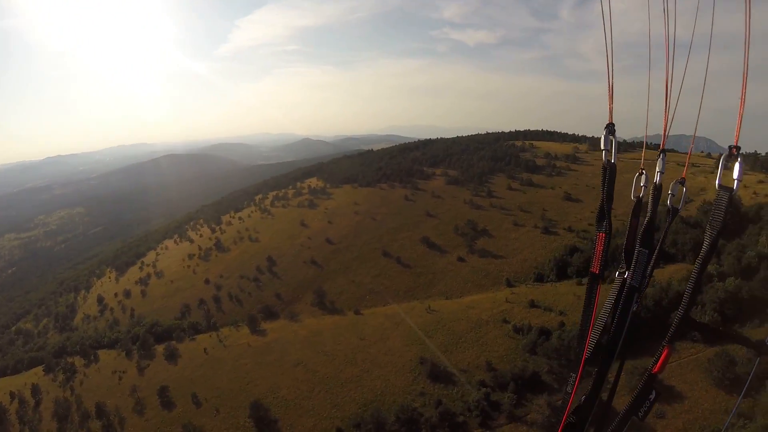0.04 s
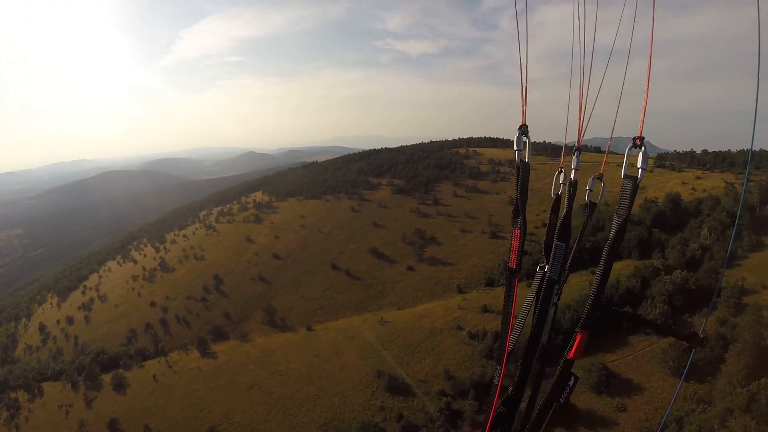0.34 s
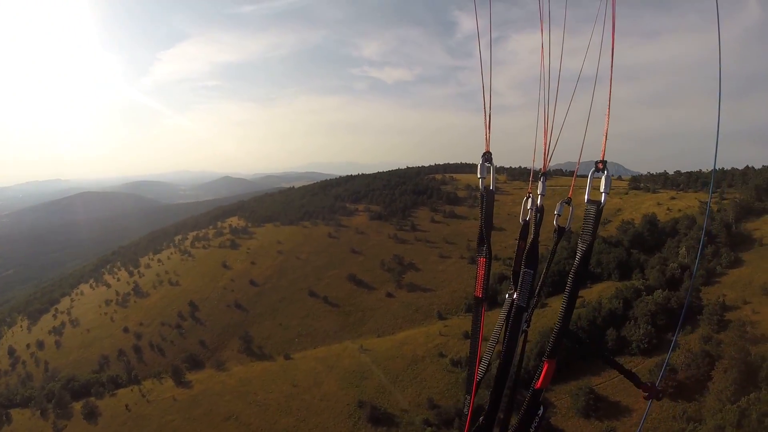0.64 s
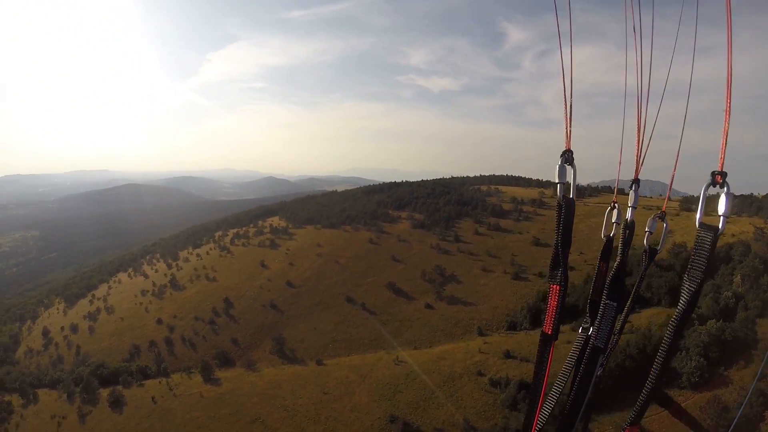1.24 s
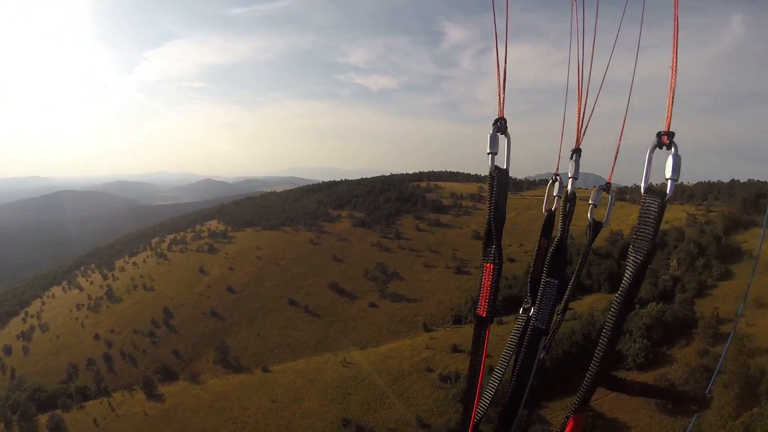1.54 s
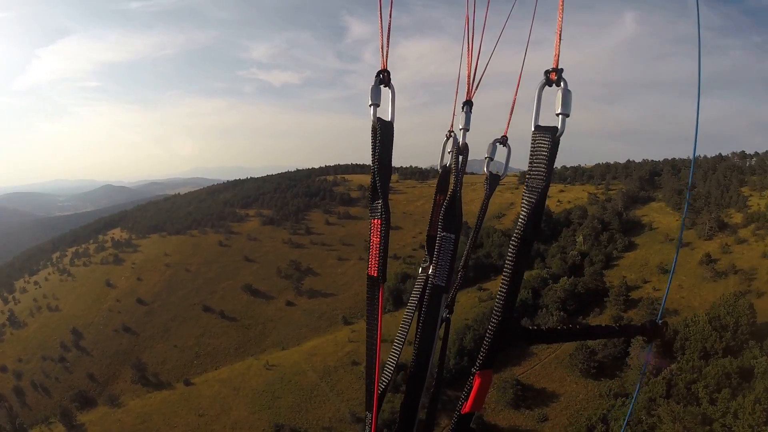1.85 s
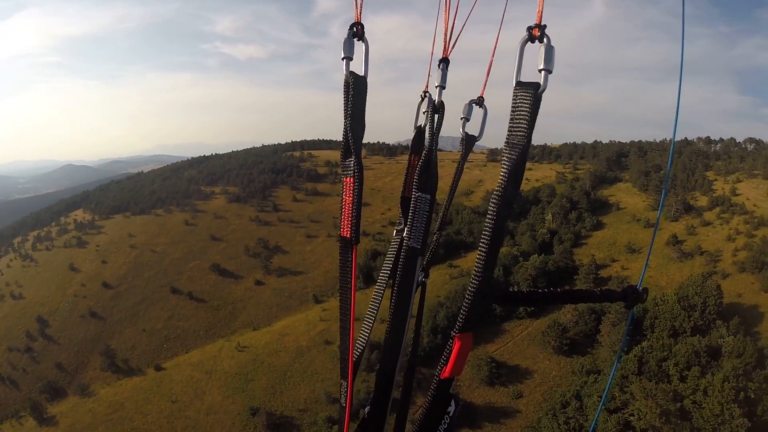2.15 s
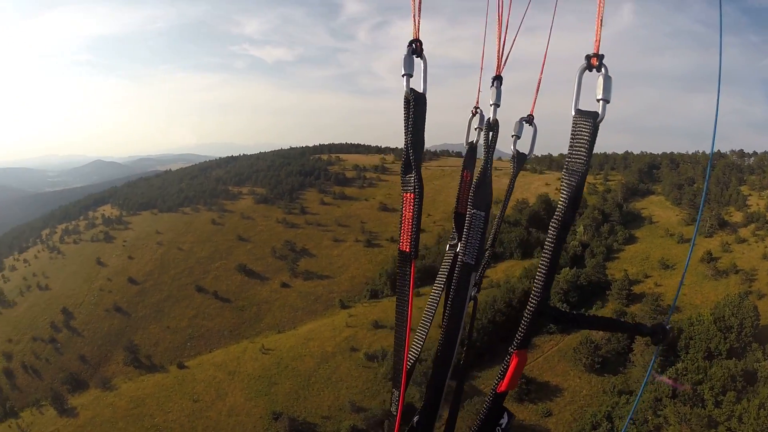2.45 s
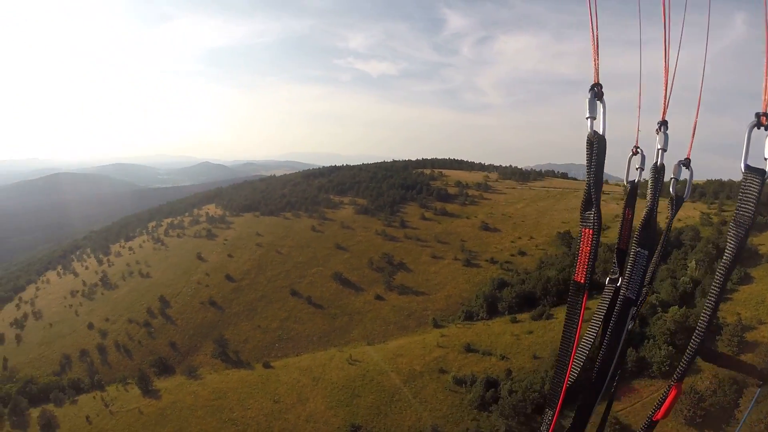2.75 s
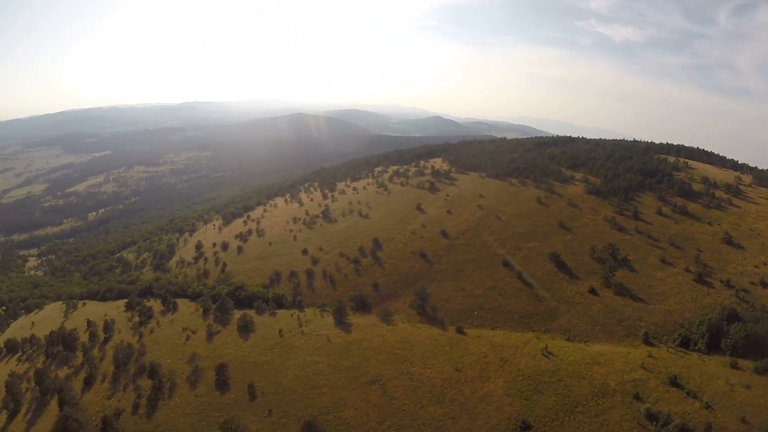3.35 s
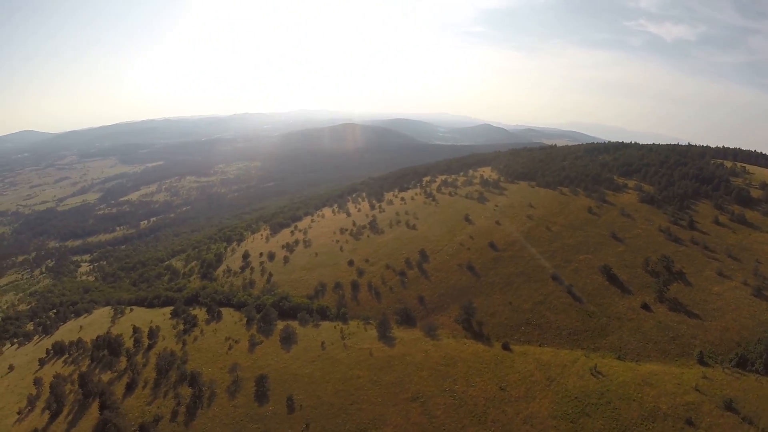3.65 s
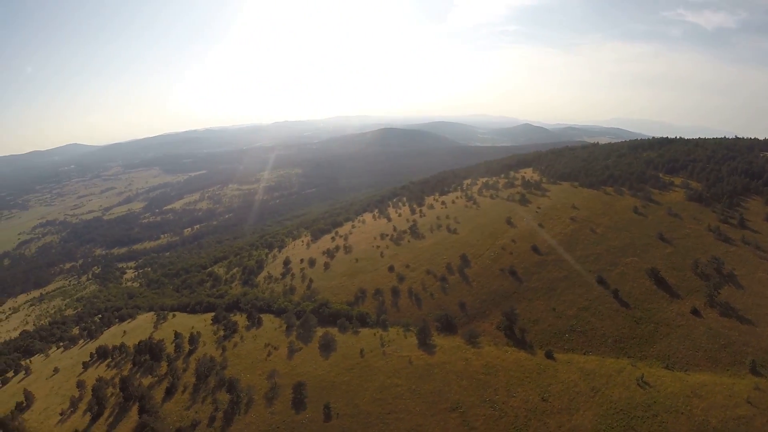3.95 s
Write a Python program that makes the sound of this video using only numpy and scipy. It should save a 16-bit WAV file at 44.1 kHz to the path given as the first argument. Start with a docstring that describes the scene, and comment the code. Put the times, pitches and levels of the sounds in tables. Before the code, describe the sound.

Wind roars and rumbles on the microphone while a paraglider's lines whistle faintly.

```python
"""Air rushes past a camera on a paraglider in flight. From the start, turbulence makes a steady rumble,
and a roar and hiss that swell as the camera turns. The suspension lines shed vortices and whistle,
gliding together with the air speed, clearest where the roar lulls. Midway a side wind darkens the roar
for a moment, and the gear crackles and ticks faintly. Near the end the air again meets the camera from
the side and sounds darker, with a fine fizz."""
import sys
import numpy as np
from scipy import signal
from scipy.fft import rfft, irfft, next_fast_len
from scipy.io import wavfile
from scipy.ndimage import uniform_filter1d, minimum_filter1d, map_coordinates

SR = 44100
rng = np.random.default_rng(int(sys.argv[2]) if len(sys.argv) > 2 else 0)


def output_pcm(signal):
    """Save a mono or channel-first signal as 16-bit PCM at the path in sys.argv[1].

    Samples are clipped to [-1, 1] before scaling.
    """
    pcm = np.clip(np.atleast_2d(signal).T, -1, 1) * 32767
    wavfile.write(sys.argv[1], SR, np.round(pcm).astype(np.int16))


N = 176400


def amp(db):
    """Amplitude ratio of a level in decibels."""
    return 10 ** (np.asarray(db) / 20)


def unit(x):
    """Normalisation to rms 1."""
    return x / np.sqrt(np.mean(x ** 2) + 1e-20)


def clock():
    """Time of each sample in seconds."""
    return np.arange(N) / SR


def curves(rows):
    """Linear interpolation: one value per sample for each column after the time."""
    times, *columns = np.transpose(rows)
    return [np.interp(clock(), times, column) for column in columns]


def swell(centre_s, half_s):
    """Gaussian envelope, down to 1/e at half_s from its centre."""
    return np.exp(-((clock() - centre_s) / half_s) ** 2)


def wobble(rate):
    """Smooth random modulation of rms 1: a spline through rate knots a second."""
    return unit(map_coordinates(rng.standard_normal(8192), [clock() * rate + 2], mode="wrap"))


def filtered(x, response):
    """Linear filtering: the spectrum of x times a frequency response."""
    size = next_fast_len(N + SR // 2)
    hz = np.fft.rfftfreq(size, 1 / SR)
    return irfft(rfft(x, size) * response(hz), size)[:N]


def coloured(x, points):
    """Spectral shaping by (Hz, dB) points joined on a log frequency axis."""
    point_hz, db = np.transpose(points)
    return filtered(x, lambda hz: amp(np.interp(np.log(hz + 1), np.log(point_hz + 1), db)))


def rush(spectrum):
    """Flow noise: white noise shaped to a spectrum, at rms 1."""
    return unit(coloured(rng.standard_normal(N), spectrum))


def eddies(rate, depth_db):
    """Amplitude modulation by passing eddies."""
    return unit(amp(depth_db * wobble(rate)))


def rumble():
    """Turbulent pressure fluctuations buffet the microphone at low frequencies."""
    # Each row: time in seconds, level in dB.
    levels = [(0, -19), (.6, -17.5), (1.3, -16), (2.3, -18), (2.75, -19), (3.2, -15), (3.7, -20.5),
              (4, -19)]
    # Each row: frequency in Hz, relative spectral density in dB.
    spectrum = [(15, -16), (30, -3.5), (60, -1.5), (130, 0), (195, -0.5), (270, -7), (400, -30),
                (1000, -45), (3000, -79), (6000, -120)]
    db, = curves(levels)
    return amp(db) * rush(spectrum) * eddies(14, depth_db=0.86)


def roar():
    """Turbulence at the microphone darkens in a side wind; front and side noises add in power."""
    # Each row: time in seconds, relative level in dB, side wind's share from 0 to 1.
    airflow = [(0, -19.5, 0.03), (.2, -22, 0), (.33, -18.5, 0), (.7, -16.5, 0.28), (.88, -18, 0),
               (1.06, -17.5, .05), (1.235, -18, 0.03), (1.27, -24.5, 0.18), (1.48, -26, 0.4),
               (1.545, -19.5, 0.01), (1.73, -16, 0.28), (2.02, -14.5, 0.71), (2.35, -17.5, 0.63),
               (2.62, -19, 0.62), (2.74, -22.5, 0.08), (2.95, -21.5, 0.24), (3.16, -27.5, 0.86),
               (3.25, -21.5, .3), (3.3, -19.5, 0.05), (3.38, -16, 0.92), (3.65, -20, 0.88),
               (3.8, -19, 0.99), (4, -19.5, 0.87)]
    # Each row of both spectra: frequency in Hz, relative spectral density in dB.
    front_spectrum = [(40, -10), (150, -2), (260, -1.5), (430, -.5), (700, 1.5), (950, 1), (1150, -2.5),
                      (1380, -10), (1700, -13.5), (2300, -30.5), (4000, -73.5), (9000, -120)]
    side_spectrum = [(40, -8.5), (150, -3), (300, 3.5), (450, 0.5), (750, -2), (1000, -9.5), (1300, -21),
                     (1800, -28.5), (2400, -38.5), (4000, -70.5), (9000, -120)]
    db, side_share = curves(airflow)
    front = amp(1.95) * np.sqrt(1 - side_share) * rush(front_spectrum)
    side = amp(1.88) * np.sqrt(side_share) * rush(side_spectrum)
    return amp(db) * (front + side) * eddies(90, depth_db=0.75)


def hiss():
    """Broadband flow noise above the roar swells as the camera turns."""
    # Each row: time in seconds, relative level in dB.
    levels = [(0, -42.5), (.2, -43), (.5, -37.5), (.78, -37), (.88, -37), (1.12, -35), (1.27, -40.5),
              (1.48, -41), (1.68, -35.5), (1.85, -36), (2.15, -37.5), (2.45, -41.5), (2.69, -40),
              (2.77, -44.5), (3.15, -43.5), (3.36, -38.5), (3.48, -42), (3.7, -43), (4, -40.5)]
    # Each row: frequency in Hz, relative spectral density in dB.
    spectrum = [(500, -6.5), (1500, 7.5), (1900, 4), (2350, -3), (2850, 1.5), (3300, -2.5), (3900, -7.5),
                (4500, -15.5), (5200, -22.5), (6300, -22.5), (7600, -32.5), (9000, -42.5), (10200, -38.5),
                (12000, -47), (15000, -50)]
    db, = curves(levels)
    return amp(db + 5.0) * rush(spectrum) * eddies(120, depth_db=0.84)


def aeolian_tone(hz, db, jitter, jitter_rate, flutter_db):
    """Vortex shedding from a cord: a firm tone when strong, less steady in pitch and level as it fades."""
    lock_db, blur_per_db = -25.5, 0.03  # below lock_db the tone blurs into a flicker
    blur = np.clip(1 + blur_per_db * (lock_db - db), 0.5, 2.2)
    shedding_hz = hz * (1 + blur * jitter * wobble(jitter_rate))
    phase = 2 * np.pi * np.cumsum(shedding_hz) / SR
    depth = np.log(amp(flutter_db * blur))
    flutter = np.exp(depth * wobble(110) - depth ** 2)  # mean power stays near 1
    return amp(db) * unit(np.sin(phase)) * flutter


def whistling_lines():
    """Strouhal's law: pitch goes as air speed over thickness, so three cords glide in parallel."""
    # Each row: time in seconds, the thin line's pitch in Hz, its level in dB.
    thin_line = [(0, 1707, -25.5), (.09, 1650, -25), (.19, 1633, -28), (.24, 1660, -27.5), (.3, 1591, -31),
                 (.42, 1540, -30), (.55, 1500, -48.5), (.95, 1680, -41.5), (1.07, 1723, -32.5),
                 (1.2, 1770, -29), (1.24, 1873, -28.5), (1.285, 1775, -23), (1.35, 1820, -26),
                 (1.405, 1823, -25.5), (1.435, 1745, -23), (1.51, 1718, -22.5), (1.55, 1700, -31),
                 (1.62, 1651, -28), (1.74, 1560, -46), (2.6, 1580, -50), (2.84, 1720, -35),
                 (2.91, 1670, -35), (3.01, 1685, -27.5), (3.125, 1815, -25), (3.17, 1847, -25.5),
                 (3.215, 1910, -35), (3.27, 1900, -52), (3.6, 1697, -71)]
    # Each row: centre in seconds, half width in seconds, peak level in dB, pitch ratio to the thin line.
    thick_line_swells = [(0.131, 0.053, -22, 0.67), (1.174, 0.26, -26.5, 0.69), (1.545, 0.026, -15, .685),
                         (1.662, 0.055, -26.5, .68), (2.873, 0.04, -26, .655), (3.065, 0.07, -26.5, .675),
                         (3.216, 0.049, -26, 0.69)]
    hz, db = curves(thin_line)
    thin = aeolian_tone(hz, db, jitter=0.017, jitter_rate=300, flutter_db=2.5)
    octave = aeolian_tone(2 * hz, db, jitter=0.014, jitter_rate=300, flutter_db=2)
    broad_strap = aeolian_tone(0.37 * hz, db, jitter=0.08, jitter_rate=210, flutter_db=3.5)
    whistles = thin + amp(-28.5) * octave + amp(-6) * broad_strap
    for centre_s, half_s, peak_db, ratio in thick_line_swells:
        thick = aeolian_tone(ratio * hz, peak_db, jitter=0.028, jitter_rate=260, flutter_db=3.0)
        whistles += swell(centre_s, half_s) * thick
    return whistles


def gear():
    """Damped transients from risers and harness: a Poisson spell of crackle and a few dry ticks."""
    # Each row: start in seconds, relative level in dB.
    ticks = [(2.059, -51), (2.095, -49.5), (2.124, -51), (2.22, -51), (2.2483, -47), (2.32, -53.5),
             (2.371, -38.5), (2.434, -49), (3.265, -40.5)]
    # Each row: frequency in Hz, gain in dB.
    colour = [(1000, -20), (3500, -2), (6000, 5.5), (9000, -4), (12000, -15.5), (15000, -18.5)]
    peak_snaps_per_s, snap_t60_s, tick_t60_s = 170, 0.0045, 0.01
    t = np.arange(SR // 40) / SR
    onsets = rng.random(N) < peak_snaps_per_s / SR * swell(centre_s=2.22, half_s=0.24)
    impulses = onsets * amp(-46.5 + 4.4 * rng.standard_normal(N))
    snap = rng.standard_normal(len(t)) * amp(-60 * t / snap_t60_s)
    clicks = signal.fftconvolve(impulses, snap)[:N]
    for start_s, db in ticks:
        tick = amp(db - 60 * t / tick_t60_s) * rng.standard_normal(len(t))
        clicks[round(start_s * SR):][:len(t)] += tick
    return coloured(clicks, colour)


def fizz():
    """The highest band of flow noise flutters rapidly, very faint until near the end."""
    # Each row: time in seconds, level in dB.
    levels = [(0, -63), (1.4, -62), (2.85, -66.5), (3.2, -60.5), (3.29, -56.5), (3.365, -53.5),
              (3.46, -59.5), (3.9, -56.5)]
    # Each row: frequency in Hz, relative spectral density in dB.
    spectrum = [(2000, -3.5), (3500, 5), (5000, 8.5), (6500, -4), (8000, -4.5), (10200, -5), (12000, -15.5),
                (15000, -21)]
    db, = curves(levels)
    return amp(db) * rush(spectrum) * eddies(250, depth_db=1.5)


def scene():
    """Superposition at one microphone in open air; the same eddies modulate roar, hiss and fizz."""
    wind = rumble() + (roar() + hiss() + fizz()) * eddies(25.04, depth_db=0.5)
    return (wind + whistling_lines() + gear())[None]


def record(dry):
    """Peak limiting and band limiting: the camera ducks peaks over its ceiling and cuts the top treble."""
    ceiling, smoothing_s, top_hz = 0.85, 0.004, 15300
    size = int(smoothing_s * SR)
    needed_gain = ceiling / np.maximum(np.abs(dry), ceiling)
    held_gain = minimum_filter1d(needed_gain, 2 * size)
    limited = dry * uniform_filter1d(uniform_filter1d(held_gain, size), size)
    return np.array([filtered(channel, lambda hz: hz < top_hz) for channel in limited])


dry = scene()
out = record(dry)
output_pcm(out)
```